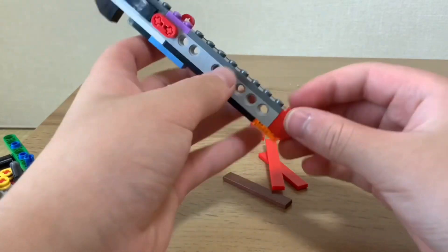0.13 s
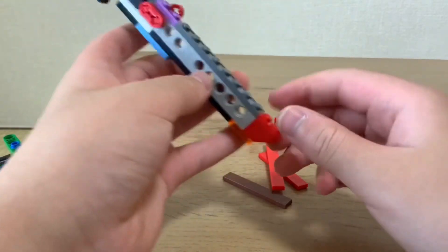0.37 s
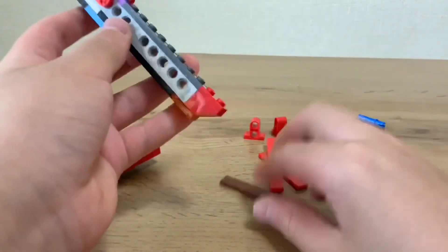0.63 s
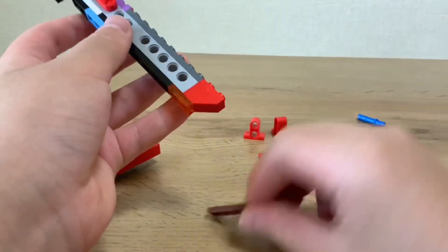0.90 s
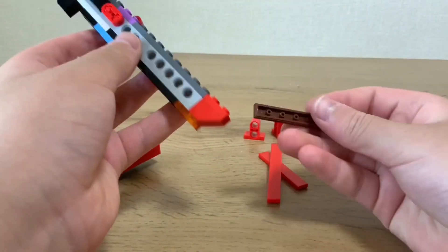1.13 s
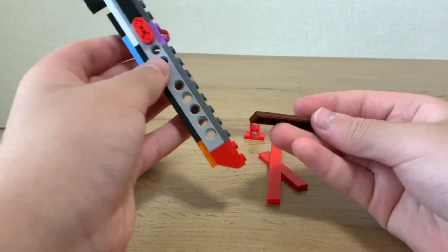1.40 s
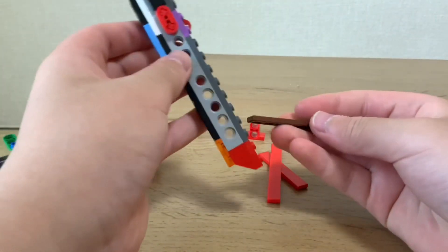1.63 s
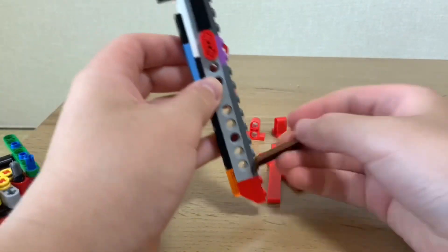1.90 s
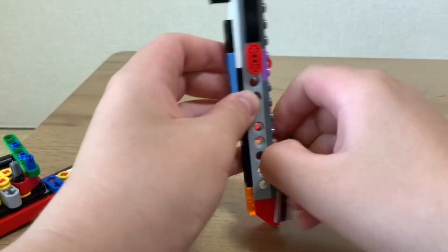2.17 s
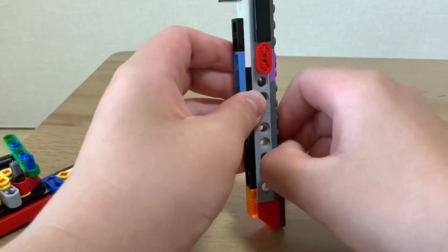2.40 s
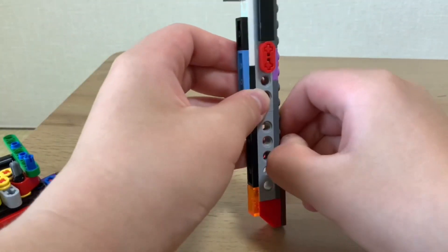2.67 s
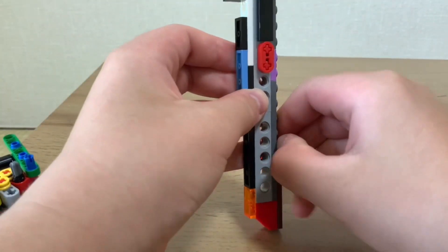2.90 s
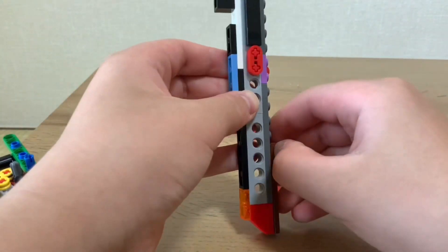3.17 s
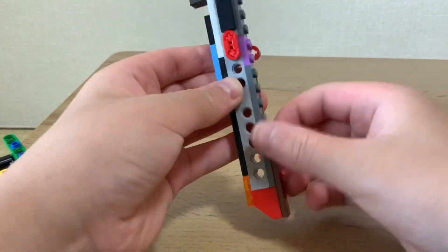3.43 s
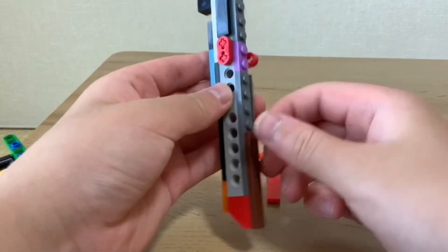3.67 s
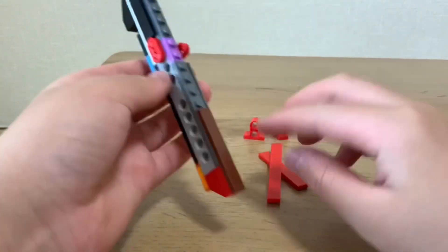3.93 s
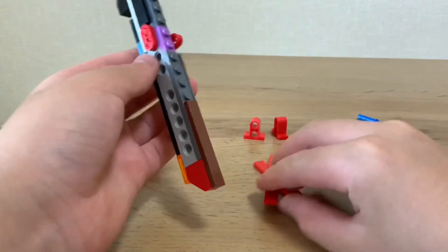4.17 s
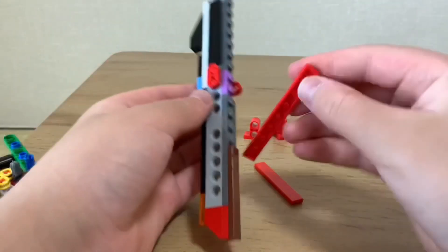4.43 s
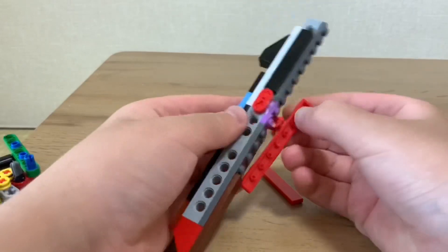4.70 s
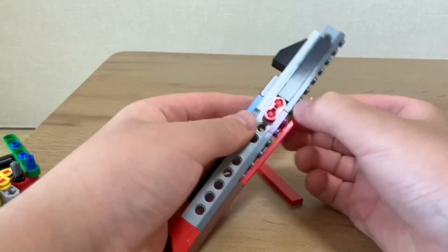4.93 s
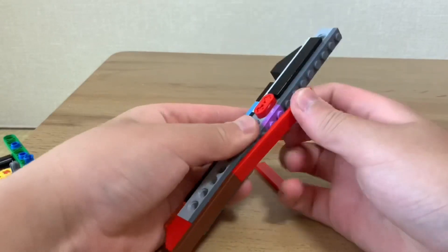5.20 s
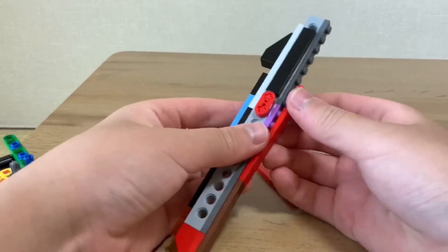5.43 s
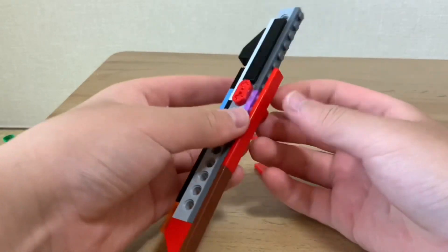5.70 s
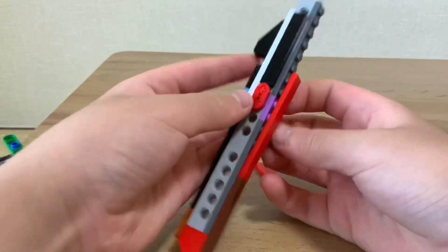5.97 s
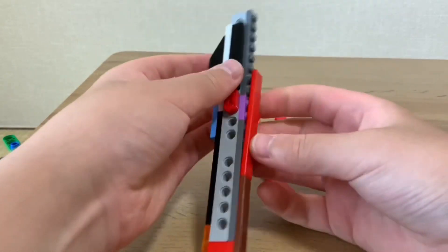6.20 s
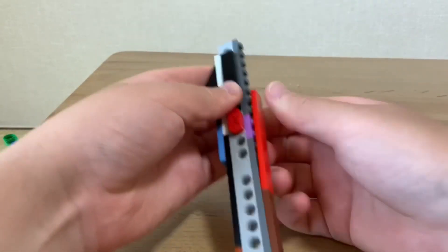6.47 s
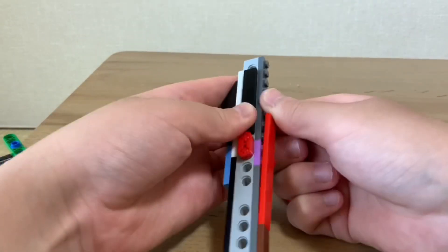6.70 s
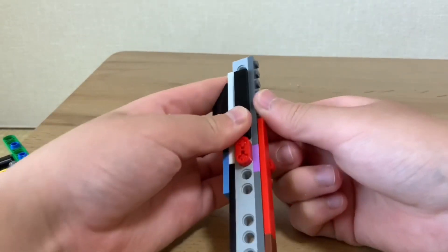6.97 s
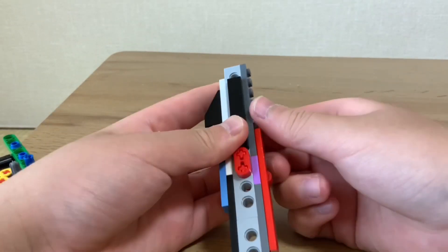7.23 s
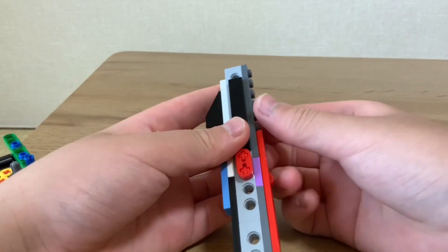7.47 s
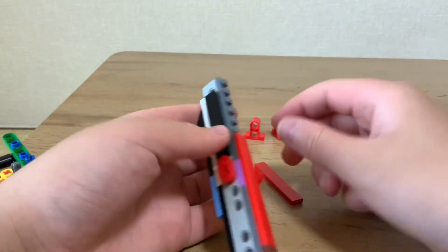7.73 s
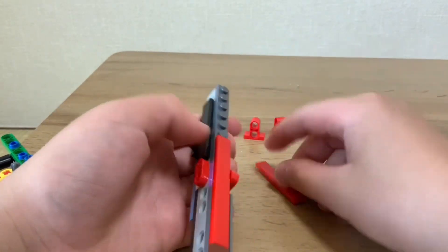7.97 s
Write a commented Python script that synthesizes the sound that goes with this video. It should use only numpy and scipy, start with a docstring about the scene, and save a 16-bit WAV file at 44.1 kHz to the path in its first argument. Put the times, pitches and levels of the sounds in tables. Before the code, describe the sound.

Reversed close-up handling of plastic building bricks: bright sharp clacks, faint scrapes and soft table knocks over low, steady room noise.

```python
"""Small quiet room: hands pull small plastic bricks off a long beam and drop them on a wooden table.
Contacts are noise bursts ringing plastic modes; slides, rattles and soft knocks are swells of dense slips;
pushes swing the table. Steady air noise and faint hums lie beneath.
A phone's two microphone ports pick it up close by.
The whole is played backwards: each room tail swells up to its click, which stops dead."""
import sys
import numpy as np
from scipy import signal
from scipy.fft import rfft, irfft
from scipy.io import wavfile
from scipy.ndimage import uniform_filter1d

SR = 44100
rng = np.random.default_rng(int(sys.argv[2]) if len(sys.argv) > 2 else 0)


def store_pcm(level_fs):
    """Save levels as 16-bit WAV."""
    pcm = np.round(np.clip(level_fs, -1, 1) * 32767).astype(np.int16)
    wavfile.write(sys.argv[1], SR, np.atleast_2d(pcm).T)


def invert_db(x):
    """Field ratio 10**(x/20) for x, a level in decibels (scalar or array-like)."""
    u = np.asarray(x, float) / 20
    return 10 ** u


N = 357651

# room noise spectrum, shape only: (frequency [Hz], level [dB])
AIR_SPECTRUM = [(20, -8), (60, 1.5), (124, -10), (212, -8.5), (342, -7), (492, -15), (670, -13.5),
                (839, -10), (1430, -27), (2100, -18.5), (2900, -40.5), (9000, -42.5), (13500, -43.5),
                (15500, -53.5)]
# far appliance: (frequency [Hz], rms level [dB])
APPLIANCE_HUMS = [(59.2, -74.5), (220.7, -74.5), (258.4, -85), (333.8, -76.5), (495.3, -72.5),
                  (845.2, -74.5), (920.5, -91.5)]
# bricks sliding or rattling, and soft knocks, times as heard:
# (middle [s], nominal length [s], tick level [dB], weight = knock above tick [dB])
SLIP_SWELLS = [(0.454, 0.12, -72, 2.5), (0.575, 0.18, -67.5, -11), (0.768, 0.047, -30, -29),
               (0.838, 0.089, -56, 1), (0.91, 0.15, -68, 3), (1.035, 0.091, -72, 3.5),
               (1.42, 0.056, -72.5, -4.5), (1.897, 0.051, -68.5, -9), (2.218, 0.042, -54, 3.5),
               (2.295, 0.075, -55.5, 3.5), (2.37, 0.1, -83, 5.5), (2.441, 0.023, -34.5, -23),
               (2.528, 0.11, -64, -4), (2.659, 0.053, -89, 31.5), (3.038, 0.036, -67.5, 5),
               (3.286, 0.069, -71, 5.5), (3.357, 0.08, -66, -26), (3.505, 0.069, -65.5, -31),
               (3.704, 0.11, -66, -20.5), (3.804, 0.12, -62, -19), (3.95, 0.24, -65, -17),
               (4.065, 0.06, -65.5, 3), (4.112, 0.065, -45, -15), (4.247, 0.23, -60.5, -3),
               (4.49, 0.24, -72, -6.5), (4.58, 0.12, -65, -12), (4.693, 0.21, -76.5, -7),
               (4.952, 0.068, -49, -8), (5.036, 0.021, -38, -8), (5.206, 0.076, -69.5, 2),
               (5.342, 0.038, -78.5, 16.5), (5.524, 0.038, -69, 7), (5.557, 0.015, -38.5, -12),
               (5.928, 0.06, -63.5, 14), (5.965, 0.043, -62.5, 11.5), (6.015, 0.064, -56.5, 6),
               (6.102, 0.11, -73.5, 17.5), (6.179, 0.04, -54.5, 8), (6.33, 0.037, -71, -13.5),
               (6.53, 0.079, -62.5, -8), (6.581, 0.04, -54.5, -12), (6.804, 0.058, -79.5, 19),
               (6.978, 0.056, -78.5, 14.5), (7.154, 0.17, -75.5, 8), (7.412, 0.052, -73, 8.5),
               (7.565, 0.061, -67, 6), (7.655, 0.085, -75.5, 17), (7.776, 0.06, -66, 1),
               (7.798, 0.021, -48.5, -6.5), (8.01, 0.038, -30.5, -28), (8.098, 0.025, -48, 0)]
# contacts, times as heard:
# (time [s], tick level [dB], weight = knock above tick [dB], push t60 [ms], clack pitch [Hz])
CONTACTS = [(0.5539, -51.5, -7, 34, 4800), (0.6902, -27.5, -18, 31, 4500), (0.7569, -9, -26, 18, 5010),
            (0.7712, -7.5, -33.5, 7.3, 5410), (0.7745, -20, -17, 12, 4910), (0.7826, -26, -16, 17, 4420),
            (0.7913, -20, -23, 6.9, 4500), (0.7952, -2, -41.5, 8.4, 4120),
            (0.974, -14.5, -18.5, 10.3, 3536), (1.9331, -16.5, -35, 5.4, 4500),
            (2.0172, -28, -34, 3.6, 4930), (2.0716, -38, -18, 9.8, 3680), (2.192, -40, -28, 9.6, 3900),
            (2.2163, -14.5, -45, 29, 4250), (2.2472, -21.5, -18, 8.1, 3970), (2.2699, -47, -22, 17, 2800),
            (2.2876, -32.5, -23, 14, 3400), (2.4171, -37.5, 14.5, 16, 2630), (2.4302, -10.5, -45, 17, 4740),
            (2.4352, -6, -32, 12, 5390), (2.4382, -13.5, -28, 3.4, 5170), (2.441, -17.5, -13.5, 11, 4670),
            (2.5083, -38, -16, 4.3, 4840), (2.982, -49, -26, 12.5, 4500), (3.0497, -55.5, -2.5, 18, 3300),
            (3.0635, -47.5, 12.5, 10, 3450), (3.2613, -40.5, 14.5, 8.1, 2310),
            (3.4758, -44, -32, 6.6, 5130), (3.7742, -40, -13, 14, 3080), (3.7851, -45.5, -11, 15, 4500),
            (3.8249, -34.5, -22, 12, 6000), (4.0009, -45.5, 0, 4.7, 3220), (4.089, -26, -25.5, 2.8, 3430),
            (4.0987, -15.5, -41, 25, 4800), (4.1049, -19, -53, 7.7, 5240), (4.1177, -20, -41, 5.5, 4820),
            (4.1205, -18, -45, 4.3, 4900), (4.1318, -21, -33, 17, 5000), (4.1646, -18, -33, 8, 4080),
            (4.192, -13.5, -28.5, 29, 4020), (4.1998, -16.5, -27, 25, 2990), (4.2034, -18, -32, 8.3, 3950),
            (4.2746, -33, -17, 7.3, 4280), (4.3446, -10, -27, 13, 3940), (4.4349, -24.5, -22.5, 6.2, 3240),
            (4.5592, -44, -23, 13, 2900), (4.6016, -44, -21, 6.4, 2900), (4.6351, -47, -6, 9.5, 5400),
            (4.6473, -41.5, -29, 24, 3985), (4.761, -62, 4, 8, 3680), (4.7937, -39.5, -18, 22, 3400),
            (4.8184, -46, -19, 7, 4830), (4.8526, -60, -3, 13, 3000), (4.924, -26.5, -28, 13, 4300),
            (4.9368, -24, -17, 10, 3820), (4.9484, -19, -32, 6.7, 5000), (4.9561, -25.5, -9, 17.5, 3000),
            (5.0417, -38.5, 7, 8, 2460), (5.263, -54, -9, 6, 4000), (5.4629, -30.5, -29.5, 4.3, 3950),
            (5.4726, -51.5, -11, 9, 3300), (5.5638, -41, 4, 17, 2900), (5.9432, -53.5, 17, 26, 2250),
            (6.0863, -67, 21, 9.3, 2200), (6.225, -25.5, 2.5, 34, 2200), (6.4158, -42.5, -28, 18, 4500),
            (6.5096, -48, -14, 16, 4500), (6.598, -49, -8, 13, 3730), (6.606, -34.5, -22, 4, 4450),
            (6.7534, -46.5, 8.5, 1.5, 4000), (6.7587, -26.5, -17.5, 9, 2430), (7.6372, -62, 21.5, 30, 2100),
            (7.711, -76, 31.5, 13, 2200), (7.7974, -40, 9.5, 29, 2400), (7.9968, -8.5, -32, 36, 5700),
            (8.0106, -8, -35, 23, 5840), (8.0216, -12.5, -33, 9.4, 4700), (8.028, -5, -41.5, 10, 4600),
            (8.0339, -19, -30, 6.4, 5300), (8.0439, -27.5, -17, 18, 4000), (8.0991, -23.5, -14.5, 24, 3600)]
# plastic modes, three families: (frequency [Hz], width [Hz], level [dB])
TICK_MODES = [(7770, 333, -9.5), (9720, 2400, 12), (12420, 640, 0), (13740, 1200, -2.5), (15330, 620, 1),
              (17000, 350, -11.5)]
CLACK_MODES = [(2010, 490, 1.5), (2900, 560, 1), (3600, 740, 1), (4500, 1100, 1.5), (5100, 550, -3),
               (6500, 1100, 2.5), (7000, 1700, -1.5)]
KNOCK_MODES = [(404, 150, -4.5), (517, 160, -4.5), (711, 40, -6.5), (905, 62, -10), (1075, 150, -4),
               (1432, 480, 1), (1910, 300, -8.5)]
# thin high modes of the long beam, rung with the knock: (frequency [Hz], width [Hz], level [dB])
BEAM_MODES = [(8200, 33, -32), (12400, 81, -29.5)]
# weight through the hands into the table, times as heard: (time [s], level [dB], push t60 [ms])
TABLE_PUSHES = [(2.345, -49.5, 30), (2.421, -37, 17), (2.668, -56.5, 20), (3.065, -50, 20),
                (3.262, -41, 20), (3.96, -53.5, 30), (4.957, -43, 30), (5.045, -50.5, 20), (5.562, -57, 16),
                (5.947, -56.5, 30), (6.227, -44, 20), (6.405, -42, 40), (6.831, -46, 40), (7.641, -55, 20),
                (7.8, -46, 20)]
# low modes of the table top: (frequency [Hz], width [Hz], level [dB])
TABLE_MODES = [(69.8, 69, -6.5), (110.7, 25, 0.5), (149.8, 12, -5.5), (210, 43, 5), (309.4, 45, -6),
               (435, 60, -16.5)]
# room decay: (frequency [Hz], t60 [s])
ROOM_DECAY = [(300, 0.29), (1000, 0.28), (3000, 0.33), (8000, 0.31), (15000, 0.31)]
# room tail spectrum: (frequency [Hz], level [dB])
ROOM_SPECTRUM = [(300, 4), (800, -12), (1600, -4), (3000, -4), (5500, -5), (8000, -7.5), (11000, -16),
                 (13500, -14), (16000, -15.5)]
# left port against right, for hands and for room noise:
# (frequency [Hz], likeness [0-1], phase turn [rad], level [dB])
HANDS_AT_PORTS = [(70, .85, 0, -9), (170, .8, 6.5, -13), (350, .9, 3, -7.5), (500, 0.2, 8, -5),
                  (620, .7, 4, -8), (794, .75, 3.5, -7), (1010, 0.3, 4.5, -2), (1300, .35, 1.8, -3.5),
                  (2000, .7, 3, 0), (3000, 0.3, 2, -0.7), (4500, 0.2, -1.04, 2.5), (6000, 0.5, -4.5, 3.8),
                  (7300, 0.05, -4.5, -3.5), (9330, 1, -2.5, 0.5), (16000, 0.77, -11.5, 0.5)]
AIR_AT_PORTS = [(70, 1, .6, -0.5), (170, 0.53, 0.38, 0.9), (350, 0.95, 2.4, 0.3), (520, .2, 4, -4.5),
                (700, 0.77, 6.4, -1.5), (950, .55, 8.5, -4), (1300, 0.067, 24, 5), (1900, .4, 6, -1.5),
                (3000, .1, 22, 3.4), (16000, .1, 7.5, -1.9)]


def evened(x):
    """Scales to rms 1."""
    return x / np.sqrt(np.mean(x ** 2) + 1e-20)


def read(points, hz, axis=1):
    """One table column, linear on a log-frequency axis."""
    table = np.transpose(points)
    return np.interp(np.log(hz + 1), np.log(table[0] + 1), table[axis])


def place(heard_s):
    """Forward-time sample of a moment heard at heard_s."""
    return N - 1 - round(heard_s * SR)


def add(mix, at, sound):
    """Mixes a sound in from sample at."""
    part = mix[:, max(at, 0):][:, :sound.shape[1]]
    part += sound[:, :part.shape[1]]


def decaying_modes(t_s, hz, width_hz, db):
    """Damped sines; a wider mode dies sooner."""
    return invert_db(db) * np.exp(-np.pi * width_hz * t_s) * np.sin(2 * np.pi * hz * t_s)


def ring(modes, bright_hz=None, focus_db=0, edge=0.6, grip_db=0):
    """Answer of modes to one sharp blow; a mode an octave from bright_hz loses focus_db."""
    t_s = np.arange(1024) / SR
    hz, width_hz, db = np.transpose(modes)[:, :, None]
    if bright_hz:
        db = db - focus_db * np.log2(hz / bright_hz) ** 2
    # where the fingers hold damps some modes and frees others
    db = db + np.resize(grip_db, len(modes))[:, None]
    sign = (-1) ** np.arange(len(modes))[:, None]  # neighbouring modes move in opposite senses
    answer = (sign * decaying_modes(t_s, hz, width_hz, db)).sum(0)
    # small bodies send no bass
    highpass = signal.butter(4, edge * hz.min(), "high", fs=SR, output="sos")
    return signal.sosfilt(highpass, answer)


def coloured(points):
    """Two unrelated noises with the given spectrum, rms 1."""
    hz = np.fft.rfftfreq(N, 1 / SR)
    spectrum = rfft(rng.standard_normal((2, N)))
    return evened(irfft(spectrum * invert_db(read(points, hz)), N))


def air():
    """Steady room noise plus hums whose frequency wavers slowly."""
    air_rms_db, waver_rms_hz = -61.5, 4.0
    t_s = np.arange(N) / SR
    out = invert_db(air_rms_db) * coloured(AIR_SPECTRUM)
    for hz, rms_db in APPLIANCE_HUMS:
        drift = evened(uniform_filter1d(rng.standard_normal((2, N)), 4000))
        waver_cycles = np.cumsum(waver_rms_hz * drift, axis=1) / SR
        out = out + np.sqrt(2) * invert_db(rms_db) * np.sin(2 * np.pi * (hz * t_s + waver_cycles))
    return out


def slip_swells():
    """Slides, rattles, soft knocks: swells of dense uneven slips ring the plastic and beam modes."""
    clack_db, clack_db_per_weight_db = -4.5, 0.29
    grit = invert_db(1.3 * evened(uniform_filter1d(rng.standard_normal(N), 90)))
    slips = evened(grit * rng.standard_normal((3, 2, N)))
    heard_s = (N - 1 - np.arange(N)) / SR
    stroke = np.zeros((3, N))
    for middle_s, length_s, tick_db, weight_db in SLIP_SWELLS:
        clack_above_tick_db = clack_db + clack_db_per_weight_db * weight_db
        levels_db = tick_db + np.array([0, clack_above_tick_db, weight_db])
        span = slice(max(place(middle_s + length_s), 0), place(middle_s - length_s))
        phase = np.clip((heard_s[span] - middle_s) / length_s * 1.8, -1, 1)
        swell = np.cos(np.pi / 2 * phase) ** 2
        stroke[:, span] += invert_db(levels_db)[:, None] * swell
    bodies = [ring(TICK_MODES, edge=.72), ring(CLACK_MODES), ring(KNOCK_MODES) + ring(BEAM_MODES)]
    out = np.zeros((2, N))
    for level, slip, body in zip(stroke, slips, bodies):
        unit_body = body[None] / np.linalg.norm(body)
        out += signal.oaconvolve(level * slip, unit_body, axes=1)[:, :N]
    return out


def clicks():
    """Contact: a burst of tiny slips rings the tick, clack and knock families and the beam."""
    # clack lies between tick and knock, rising with weight
    clack_db, clack_db_per_weight_db = -2, 0.47
    tick_centre_hz, tick_scatter, grip_spread_db = 12820, .04, 3.5
    rise_s, bump_s, bump_width_s, early_s = 0.00099, .0006, 0.0009, .0007
    out, t_s = np.zeros((2, N)), np.arange(1024) / SR
    for heard_s, tick_db, weight_db, t60_ms, clack_hz in CONTACTS:
        slips = rng.standard_normal((3, 2, 1024))
        grip_db = grip_spread_db * rng.standard_normal(len(CLACK_MODES))
        tick_hz = tick_centre_hz * np.exp(tick_scatter * rng.standard_normal())
        clack_above_tick_db = clack_db + clack_db_per_weight_db * weight_db
        levels_db = tick_db + np.array([0, clack_above_tick_db, weight_db])
        push = (1 - np.exp(-t_s / rise_s)) * invert_db(-60 * t_s * 1000 / max(t60_ms, .5))
        push *= 1 + 0.81 * np.exp(-((t_s - bump_s) / bump_width_s) ** 2)  # first contact is hardest
        knock_hz = 900 * (clack_hz / 3000) ** .3  # a smaller piece knocks higher too
        tick = ring(TICK_MODES, tick_hz, focus_db=45.5, edge=.72, grip_db=grip_db[::-1])
        clack = ring(CLACK_MODES, clack_hz, focus_db=5, grip_db=grip_db)
        knock = ring(KNOCK_MODES, knock_hz, focus_db=3.5) + ring(BEAM_MODES)
        for db, body, noise in zip(levels_db, [tick, clack, knock], slips):
            sound = signal.fftconvolve(noise * push, body[None], axes=1)
            peak = abs(sound).max(1, keepdims=True)
            add(out, place(heard_s + early_s), invert_db(db) * sound / peak)
    return out


def thumps():
    """A soft uneven push swings the table top in its low modes."""
    out, t_s = np.zeros((2, N)), np.arange(4096) / SR
    top = sum(decaying_modes(t_s, *mode) for mode in TABLE_MODES)
    for heard_s, db, t60_ms in TABLE_PUSHES:
        push = rng.standard_normal((2, 4096)) * invert_db(-60 * t_s * 1000 / max(t60_ms, 2))
        swing = signal.fftconvolve(push, top[None], axes=1)
        add(out, place(heard_s), invert_db(db) * swing / abs(swing).max(1, keepdims=True))
    return out


def room(x):
    """Sparse taps of random sign, each band dying at its own speed."""
    first, spacing = 140, 16  # samples
    taps = np.zeros((2, SR // 2))
    grid = np.arange(first, SR // 2 - spacing, spacing)
    at = grid + rng.integers(0, spacing, (2, len(grid)))
    np.put_along_axis(taps, at, rng.choice([-1., 1.], at.shape), 1)
    hz, t_s, bands = signal.stft(taps, SR, nperseg=128)
    t60_s = read(ROOM_DECAY, hz)[:, None]
    decay_db = read(ROOM_SPECTRUM, hz)[:, None] - 60 * t_s / t60_s
    # the divisors even out energy over decay time and tap density
    tail = signal.istft(bands * invert_db(decay_db) / np.sqrt(t60_s), SR, nperseg=128)[1]
    tail = tail / np.sqrt(SR / spacing / np.log(1e6))
    return signal.fftconvolve(x, tail, axes=1)[:, :N]


def ports(x, table):
    """Left port hears early and phase-turned; x[1] is a twin supplying what the ports do not share."""
    lead_samples = 29
    hz = np.fft.rfftfreq(N, 1 / SR)
    shared, twin = rfft(x)
    likeness = np.clip(read(table, hz), 0, 1)
    turn = np.exp(1j * (2 * np.pi * hz * lead_samples / SR - read(table, hz, axis=2)))
    blend = likeness * shared + np.sqrt(1 - likeness ** 2) * twin
    left = invert_db(read(table, hz, axis=3)) * turn * blend
    return irfft(np.array([left, shared]), N)


def scene():
    """Forward time, as it reaches the two ports."""
    noise = ports(air(), AIR_AT_PORTS)
    hands = slip_swells() + clicks() + thumps()
    return noise + ports(hands + room(hands), HANDS_AT_PORTS)


def top_cut(x):
    """Nothing passes above the cut-off."""
    return signal.sosfilt(signal.butter(12, 16830, fs=SR, output="sos"), x)


def record(dry):
    """The phone's steep band limit, then reversed playback."""
    edge_hz = 15900
    hz = np.fft.rfftfreq(N, 1 / SR)
    limited = irfft(rfft(dry) / np.sqrt(1 + (hz / edge_hz) ** 200), N)
    backwards = limited[:, ::-1].copy()
    return top_cut(backwards)


dry = scene()
out = record(dry)
store_pcm(out)
```